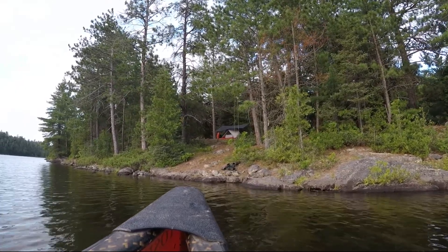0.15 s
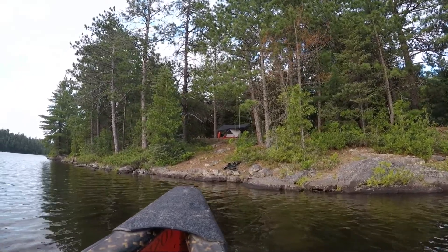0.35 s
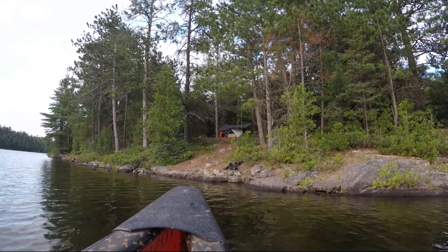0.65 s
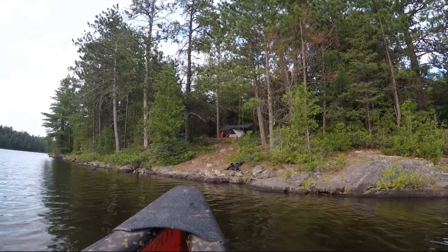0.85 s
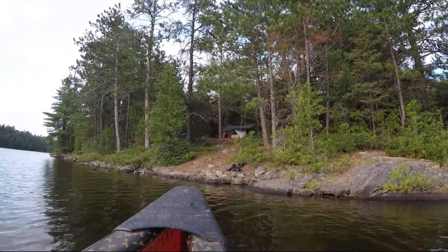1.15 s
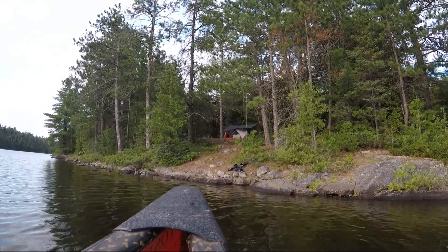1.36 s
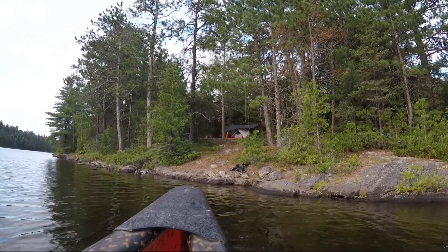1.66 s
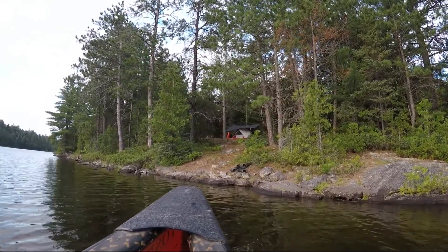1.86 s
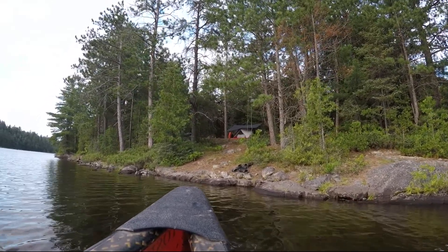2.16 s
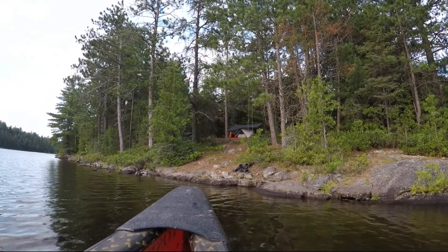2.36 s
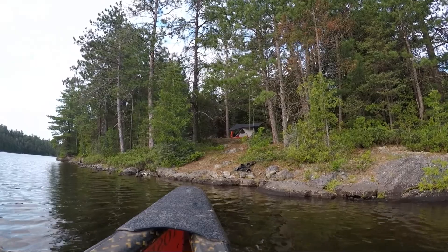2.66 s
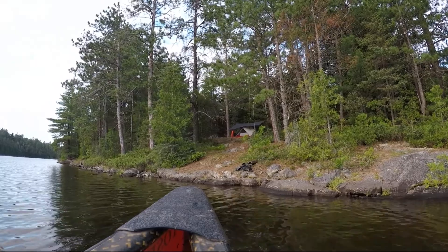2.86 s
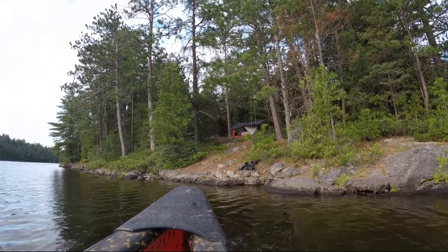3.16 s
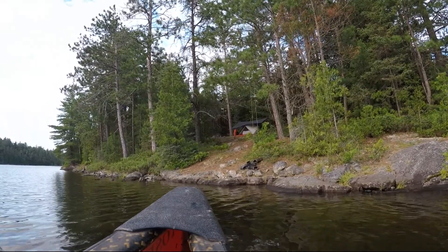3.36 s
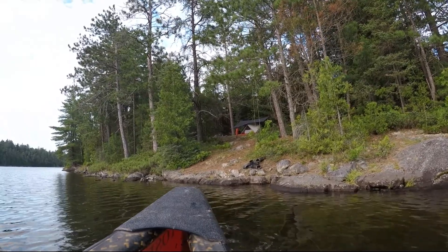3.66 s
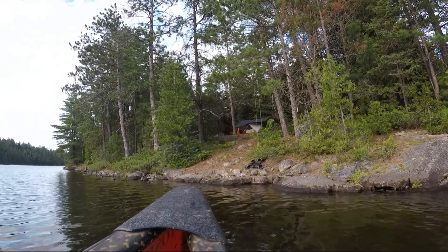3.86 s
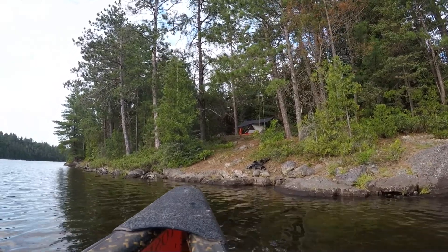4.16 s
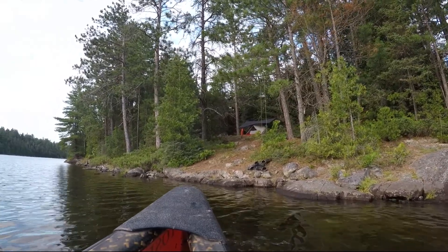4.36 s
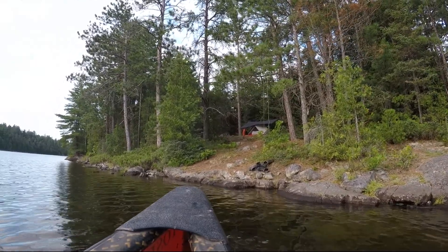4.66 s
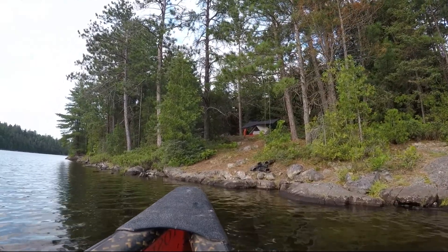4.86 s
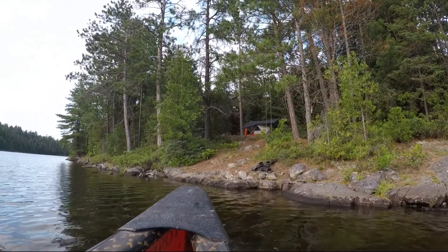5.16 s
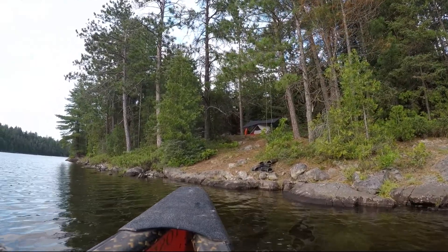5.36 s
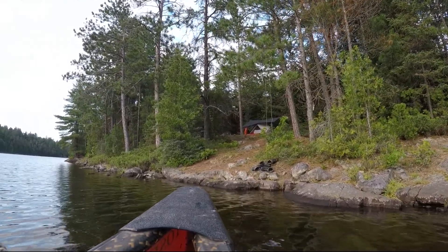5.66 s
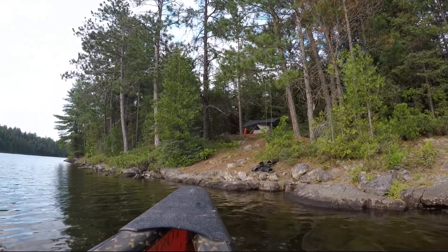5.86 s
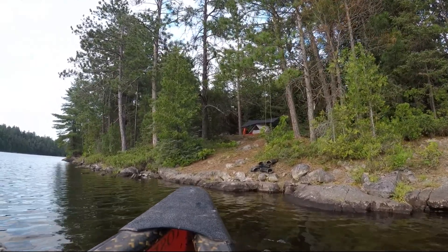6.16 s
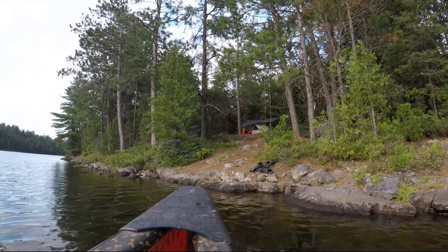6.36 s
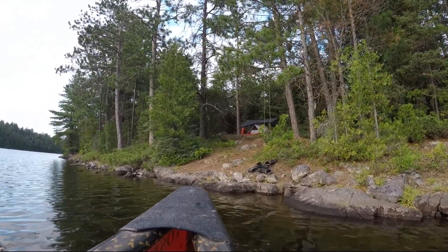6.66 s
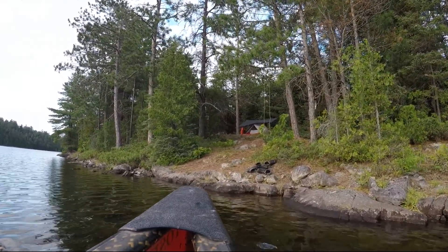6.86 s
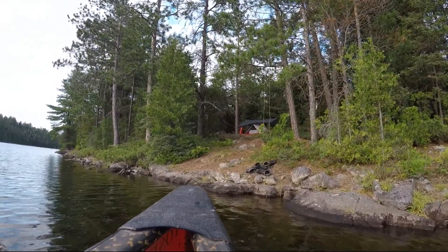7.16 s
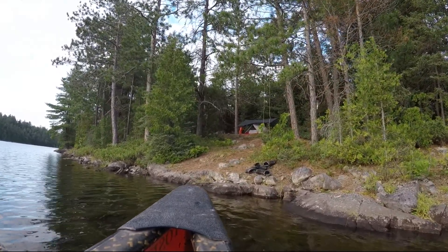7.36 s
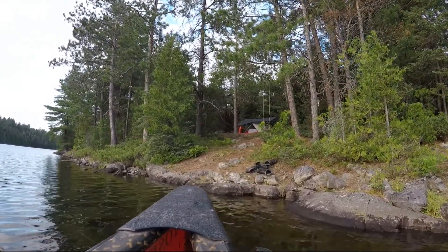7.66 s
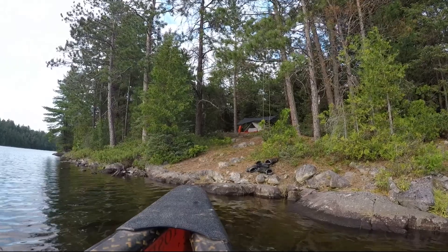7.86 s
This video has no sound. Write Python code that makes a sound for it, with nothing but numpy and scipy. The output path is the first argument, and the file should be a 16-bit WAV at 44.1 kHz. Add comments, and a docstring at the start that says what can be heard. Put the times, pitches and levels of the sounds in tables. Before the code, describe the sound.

From inside a canoe on a calm lake, faint lapping and light low wind sit under soft hiss. Small dull knocks come first, then a booming drag and thump. A heavy hollow double knock midway is the loudest event, followed by smaller thumps and rumbling scrapes. Later it quiets, with short close cloth rubs, a tiny drip, a sharp tick and two more thuds. The microphone is fixed to the boat in a closed case.

```python
"""Canoe adrift on a calm lake

Knocks of paddle and gear, and soft wave slaps, ring the hull's modes; drags boom, rumble and scrape.
Cloth rubs in noisy strokes near a closed case fixed to the boat; short rings make its ticks and one drip.
Water laps under the hull as bands of noise, with light wind in the bass and electronic hiss on top."""
import sys
import numpy as np
from scipy.fft import rfft, irfft, next_fast_len
from scipy.io import wavfile
from scipy.ndimage import map_coordinates

SR = 44100
rng = np.random.default_rng(int(sys.argv[2]) if len(sys.argv) > 2 else 0)


def to_wav(s):
    """Save 16-bit WAV."""
    ch = np.atleast_2d(s).T  # columns
    pcm = np.round(np.clip(ch, -1, 1) * 32767)  # PCM
    wavfile.write(sys.argv[1], SR, pcm.astype(np.int16))


N = 353241  # length in samples, about 8 s

# Noise colours give relative density: pitch_hz, level_db (per Hz).
# Resonance levels and widths are for one pass; each bank is applied twice.

# electronic hiss: noise colour, then its slightly wavering level: time_s, level_db
HISS_COLOUR = [(2000, -10), (2700, 0), (3300, -4.5), (4600, -1.5), (6630, -4), (8100, -1.5), (9750, -1),
               (11000, -5), (11600, -18.5), (12600, -7), (15400, -17)]
HISS_LEVEL = [(0.0, -63.5), (2.8, -64.5), (3.3, -63), (4.0, -64.5), (6.45, -64), (6.65, -62), (7.6, -63),
              (8.01, -64.5)]
TOP_HZ = 15450  # band limit of the whole mix

# wind and water levels: time_s, wind_db, deep_lapping_db, lapping_db
WATER_LEVELS = [(0.0, -57, -57, -53), (0.35, -55, -69, -51), (0.56, -49.5, -41.5, -46),
                (1.16, -45.5, -51.5, -51.5), (1.5, -48.5, -55.5, -52.5), (1.76, -39.5, -42, -44),
                (2.1, -45.5, -51, -53), (2.6, -42.5, -53, -54), (2.9, -41.5, -46.5, -48),
                (3.48, -51, -51, -51.5), (3.77, -46, -37.5, -44), (4.2, -54, -54, -41),
                (4.5, -46.5, -45, -47.5), (5.0, -40.5, -48.5, -50), (5.64, -43.5, -49.5, -53),
                (6.3, -53.5, -57.5, -53.5), (6.87, -56, -67, -47), (7.3, -48.5, -66, -47.5),
                (7.45, -35, -49, -42.5), (7.79, -42, -54.5, -49), (8.01, -36, -37, -50.5)]
# dull wash level: time_s, level_db
WASH_LEVEL = [(0.0, -55), (1.4, -56.5), (2.74, -56.5), (3.43, -52.5), (3.97, -54.5), (4.15, -45.5),
              (4.28, -55), (6.47, -56), (7.03, -51), (7.3, -54), (8.01, -55)]
# noise colours of the wind, deep lapping, lapping and dull wash
WIND_COLOUR = [(14, -29), (27, -1.5), (44, -6.5), (60, -8), (100, -24)]
SLOSH_COLOUR = [(40, -33), (60, -2), (100, 3.5), (140, -10.5)]
LAP_COLOUR = [(90, -49), (130, 1.5), (200, -2), (330, -11), (500, -33.5)]
WASH_COLOUR = [(250, -2), (400, 0), (800, -7), (1600, -11.5), (2400, -16.5), (2900, -35), (3500, -43)]

# case resonances: pitch_hz, width_hz, level_db
CASE_MODES = [(2210, 840, -4.5), (3330, 590, -1.5), (4080, 520, 1.55), (6230, 470, -5), (6310, 260, -0.5),
              (9400, 2400, -9.5)]
# case ticks, and one water drip at 6.952 s, levels before a fixed boost:
# start_s, ring_db, ring_hz, overtones_db (over the ring), spit_db, t60_s
TICKS_AND_DRIP = [(.44, -48, 1290, -15, -45, 0.023), (0.849, -51, 5130, -30, -42, 0.022),
                  (1.636, -53, 2330, -1, -46, 0.033), (1.68, -51, 2030, 0, -46, 0.022),
                  (1.696, -47, 2000, -10, -47, 0.03), (1.714, -53.5, 2170, -4, -55, 0.054),
                  (1.749, -50, 4440, -33, -46, 0.013), (2.19, -38, 1870, -25, -58, 0.01),
                  (2.337, -46.5, 1800, -25, -60, .02), (2.483, -32.5, 2860, -30, -36, 0.0069),
                  (4.263, -38, 1670, -23, -57, 0.025), (6.952, -42, 900, -25, -60, 0.023),
                  (6.97, -37, 2380, -25, -57, 0.015), (7.5413, -21, 2010, 1.5, -31, 0.0069)]

# strokes of cloth: start_s, swell_s, hold_s, release_db_per_s, bright_rub_db, dull_rub_db, silky_rub_db
CLOTH_STROKES = [(6.468, 0.0058, 0.081, 1500, -45.5, -59.5, -57), (6.647, .008, 0.041, 1200, -57, -72, -70),
                 (6.737, 0.02, .008, 350, -50, -61, -72), (6.793, 0.082, 0.024, 330, -47.5, -59, -56),
                 (6.943, 0.13, 0.016, 400, -50, -47.5, -48.5), (7.135, 0.039, 0.03, 1000, -68, -53, -55)]
# noise colour of the dull rub
DULL_COLOUR = [(700, -16), (1300, -0.5), (1650, 2), (2300, -7), (2800, -12), (3500, -8)]
SWELL_FROM_DB, TOPMOST_DB = -19.5, -9.5  # a swell's start; topmost rub over the silky rub

# drags on the hull, one curve each: time_s, boom_db, boom_hz, scrape_db
DRAG_CURVES = [
    [(0.36, -47, 153, -57), (0.41, -35, 148.6, -61), (0.448, -34, 105.3, -56), (0.494, -33, 101.3, -69),
     (0.544, -45, 97.5, -71), (0.574, -39, 99.5, -74), (0.72, -49, 93.7, -78)],
    [(1.59, -55, 110, -80), (1.634, -21.5, 142.3, -52), (1.69, -26, 144.6, -56), (1.716, -19, 104.6, -53.5),
     (1.745, -23, 99.6, -59), (1.77, -19, 95.4, -74), (1.82, -31, 92.7, -77), (1.92, -49, 91, -59)],
    [(4.07, -33, 129, -51), (4.126, -39, 131.8, -49), (4.198, -22, 117.6, -47), (4.23, -31, 127.4, -43.5),
     (4.27, -30, 129, -44.5), (4.308, -38, 127.5, -50), (4.378, -34.5, 125.6, -62), (4.47, -40, 120, -59)],
    [(4.47, -51, 119, -52), (4.502, -25, 116, -48), (4.524, -25, 110, -55.5), (4.62, -35, 132.7, -66),
     (4.718, -44, 156.5, -67), (4.75, -32.5, 158, -63)],
]
# one rumble weight a drag: level_db (over the mean of boom_db and scrape_db)
RUMBLE_WEIGHTS = [3.5, 3.5, -1.5, 4]
# noise colour of the dragging rumble
RUMBLE_COLOUR = [(110, 4.5), (180, 0.5), (300, 0.5), (500, -10), (900, -20.5)]
# resonances woken by the scrape: pitch_hz, width_hz, level_db
SCRAPE_MODES = [(600, 170, -17), (730, 210, 6.5), (1100, 150, 8), (1290, 220, 6.5), (1730, 310, 3.5),
                (2086, 180, 3), (2620, 250, -1)]
DEEP_HZ, DEEP_DB, GRIT_DB = 70.7, -7.5, -17.5  # deep boom, its level over the boom; grit over the scrape

# knocks of paddle and gear, and soft wave slaps (2.145-2.551 and 5.309-5.45 s), on the hull:
# start_s, boom_peak_db, favoured_pitch_hz, boom_delay_s,
# then contact_db (over boom_peak_db) at 500, 1500 and 5000 Hz
KNOCKS_AND_SLAPS = [(0.176, -35, 147, 0.0039, -7, -32, -18), (.376, -27, 186, 0.0032, -20, -29, -36),
                    (.802, -34, 161, 0.0058, -1.5, -10.5, -16), (1.422, -32.5, 112, 0.0026, -18, -13, -24),
                    (1.708, -13.5, 89.5, 0.0023, -20, -38, -32), (2.145, -36, 75, 0.0015, -14, -26, -33),
                    (2.446, -34, 75, 0.0019, -25, -28, -33), (2.551, -37.5, 83, 0.0018, -31, -20, -33),
                    (2.809, -29, 124, 0.0017, -14, -41, -35), (3.043, -20, 114, 0.0018, -19, -63, -37),
                    (3.605, -25.5, 100, 0.0028, -3, -20, -20),
                    (3.6141, -1.5, 208, 0.0017, -17.5, -27.5, -24.5),
                    (3.632, -7, 189, 0.0021, -19.5, -27.5, -50), (3.657, -14, 102, 0.0014, -18, -26.5, -34),
                    (3.897, -13.5, 101, 0.0021, -7.5, -27.5, -37), (3.926, -13, 91, 0.001, -35, -47, -41),
                    (4.023, -16, 245, 0.005, -10, -12, -34), (4.035, -14.5, 113, 0.0046, -30, -34, -57),
                    (4.507, -22.5, 113, 0.013, -22, -43, -48), (4.716, -30, 150, 0.004, -7, -39, -35),
                    (4.9331, -22.5, 151, 0.0084, -9.5, -17.5, -22),
                    (4.963, -28.5, 135, 0.002, -47, -38, -41), (5.029, -30.5, 101, 0.0018, -11.5, -34, -36),
                    (5.309, -32.5, 85, 0.002, -22, -32, -35), (5.414, -36.5, 80, 0.0011, -26, -27, -33),
                    (5.45, -38, 73, 0.0015, -28, -27, -33), (6.471, -31, 178, 0.0013, -2.5, -22, -32),
                    (7.4771, -17, 143, 0.012, -10, -19.5, -24.5),
                    (7.968, -21, 137, 0.012, -10.5, -21, -24.5)]
# deep hull modes: pitch_hz, level_db (relative), t60_s (unloaded)
HULL_MODES = [(50, -20, 0.47), (63, -8, 0.23), (92, -12, 0.65), (102.8, 3, 0.15), (131.1, -4, 0.32),
              (153.5, 2, 0.13), (200.7, -2, 0.25), (266.3, -0.5, 0.092), (308, -8, 0.15), (338, -22, 0.31),
              (399.4, -15, 0.37)]
# upper hull modes, too dense to count, ringing as noise: lowest_hz, highest_hz, t60_s (unloaded)
DENSE_BANDS = [(213, 457, 0.29), (500, 890, 0.15), (976, 1590, 0.14), (1800, 2560, 0.088),
               (2960, 5560, 0.059), (7200, 15000, 0.037)]
# the gunwale's short clack: pitch_hz, level_db (relative), t60_s
RIM_MODES = [(566, -10.5, 0.024), (750, -1, 0.0099), (794, 4, 0.023), (1119, 3, 0.022), (1200, 2, 0.028),
             (1720, -4, 0.014), (2184, -0.5, 0.028)]
DAMPING = 1.35  # load in the boat shortens the hull's rings by this factor


def amp(db):
    """Decibels to gain."""
    return np.exp(np.asarray(db) * (np.log(10) / 20))


def unit(x):
    """Scales a signal to rms 1."""
    return x / np.sqrt(np.mean(x ** 2) + 1e-20)


def curves(rows):
    """A gate open while the rows last, then one value per sample for each column after the time."""
    times, *columns = np.transpose(rows)
    t = np.arange(N) / SR
    to_edge = np.minimum(t - times[0], times[-1] - t)
    gate = np.clip(to_edge / 0.013 + 0.5, 0, 1)
    return gate, *[np.interp(t, times, column) for column in columns]


def wobble(rate):
    """A smooth random curve through rate knots a second."""
    coarse = np.arange(0, N + 16, 16)
    knots = rng.standard_normal(int(N * rate / SR) + 4)
    smooth = map_coordinates(knots, [coarse * rate / SR])
    return np.interp(np.arange(N), coarse, smooth)


def filtered(x, response):
    """Multiplies the spectrum of x by a response of frequency."""
    size = next_fast_len(N + SR // 2)
    spectrum = rfft(x, size) * response(np.fft.rfftfreq(size, 1 / SR))
    return irfft(spectrum, size)[..., :N]


def noise(colour):
    """Noise of rms 1 coloured by pitch and level points, practically silent outside them."""
    points_hz, points_db = np.transpose(colour)

    def shape(hz):
        """Gain interpolated along log frequency."""
        return amp(np.interp(np.log(hz + 1), np.log(points_hz + 1), points_db, left=-120, right=-120))

    return unit(filtered(rng.standard_normal(N), shape))


def resonate_twice(x, modes):
    """Two passes through a bank of resonances of alternating sign, which keeps the valleys dark."""
    def one_pass(f):
        """Sum of the band-pass resonances."""
        total = 0
        for k, (pitch, width, db) in enumerate(modes):
            loss = 1j * f * width
            total = total + (-1) ** k * amp(db) * loss / (pitch * pitch - f * f + loss)
        return total

    return filtered(x, lambda f: one_pass(f) ** 2)


def wind():
    """Light wind presses on the microphone as low noise that wavers slowly."""
    wind_db = curves(WATER_LEVELS)[1]
    return amp(wind_db) * unit(amp(1.4 * wobble(2.7)) * noise(WIND_COLOUR))


def lapping():
    """Ripples lap the hull from below as two low noise bands; a dull wash lies above."""
    _, _, slosh_db, lap_db = curves(WATER_LEVELS)
    ripples = wobble(15)  # shared by all three layers
    slosh = unit(amp(1.5 * ripples) * noise(SLOSH_COLOUR))
    lap = unit(amp(1.64 * ripples) * noise(LAP_COLOUR))
    wash = unit(amp(0.6 * ripples + 0.6 * wobble(60)) * noise(WASH_COLOUR))
    wash_db = curves(WASH_LEVEL)[1]
    return amp(slosh_db) * slosh + amp(lap_db) * lap + amp(wash_db) * wash


def ticks_and_drip():
    """Each tick, and the drip, is a short ring with two overtones and a spit of noise through the case."""
    ring, spit = np.zeros(N), np.zeros(N)
    t = np.arange(SR // 20) / SR
    for start, ring_db, hz, over_db, spit_db, t60 in TICKS_AND_DRIP:
        fade = amp(-60 * t / t60) * (1 - np.exp(-t / 0.0014))
        phase = 2 * np.pi * hz * t
        overtones = np.sin(2.087 * phase) + 0.24 * np.sin(3.06 * phase)
        tone = np.sin(phase) + amp(over_db) * overtones
        at = round(start * SR)
        ring[at:][:len(t)] += 1.3 * amp(ring_db) * fade * tone
        spit[at:][:len(t)] += 3.5 * amp(spit_db) * fade * rng.standard_normal(len(t))
    return ring + resonate_twice(spit, CASE_MODES)


def cloth_rub():
    """Cloth friction is flickering noise, its bright part coloured by the case, in swelling strokes."""
    flicker = amp(1.4 * wobble(300))
    bright = unit(resonate_twice(rng.standard_normal(N), CASE_MODES))
    dull = noise(DULL_COLOUR)
    silky = noise([(2600, -20), (3600, -1.5), (5000, -5), (5800, 1.0), (6800, -8), (8000, -16), (11000, -19)])
    topmost = noise([(11500, -3), (12400, -0.1), (15400, -8)])
    out, t = np.zeros(N), np.arange(N) / SR
    for start, swell, hold, release, bright_db, dull_db, silky_db in CLOTH_STROKES:
        rise_db = SWELL_FROM_DB * np.clip(1 - (t - start) / swell, 0, 1)
        fall_db = release * np.maximum(t - start - swell - hold, 0)
        stroke = (t >= start) * amp(rise_db - fall_db)
        rub = amp(bright_db) * bright + amp(dull_db) * dull
        rub += amp(silky_db) * (silky + amp(TOPMOST_DB) * topmost)
        out += stroke * rub
    return flicker * out


def drags():
    """Dragging shakes the hull into two unsteady booms and a rumble, with flickering scrape and grit."""
    rumble = noise(RUMBLE_COLOUR)
    # sparse catches, about 300 a second, stand out of the steady friction
    catches = rng.standard_normal(N) * (1 + 9 * (rng.random(N) < 300 / SR))
    scrape = unit(resonate_twice(catches, SCRAPE_MODES))
    grit = noise([(2800, -4), (4000, -1.5), (6000, -6.5), (7500, -22)])
    flicker = amp(0.88 * wobble(140))
    boom_size, boom_phase = amp(2.5 * wobble(50)), 1.1 * wobble(50)  # gain; radians

    def boom(hz):
        """A sine that follows a pitch curve, with unsteady size and phase."""
        return boom_size * np.sin(2 * np.pi * np.cumsum(hz) / SR + boom_phase)

    deep = boom(np.full(N, DEEP_HZ))
    out = np.zeros(N)
    for rows, weight_db in zip(DRAG_CURVES, RUMBLE_WEIGHTS):
        gate, boom_db, boom_hz, scrape_db = curves(rows)
        booms = amp(boom_db) * (boom(boom_hz) + amp(DEEP_DB) * deep)
        rough = amp((boom_db + scrape_db) / 2 + weight_db) * rumble
        rough += amp(scrape_db) * (scrape + amp(GRIT_DB) * grit)
        out += gate * (booms + flicker * rough)
    return out


def contact_db(hz, peak_db, upper_db):
    """Each knock or slap has its own treble levels over its boom, interpolated along log frequency."""
    points_db = [*upper_db, upper_db[-1] - 12.0]
    return peak_db + np.interp(np.log(hz), np.log([500, 1500, 5000, 10000]), points_db)


def hull_booms():
    """Each knock or slap rings the deep hull modes; these slow bending waves arrive after the treble."""
    out, t = np.zeros(N + SR), np.arange(SR // 3) / SR
    hz, mode_db, t60 = np.transpose(HULL_MODES)[:, :, None]
    waves = (1 - np.exp(-t * hz / 0.43)) * np.sin(2 * np.pi * hz * t)
    for start, peak_db, spot_hz, delay, *_ in KNOCKS_AND_SLAPS:
        # modes near the spot's pitch are favoured
        level_db = mode_db - 12 * np.abs(np.log2(hz / spot_hz)) + rng.normal(0, 2.0, hz.shape)
        ring = np.sum(amp(level_db - 60 * t * DAMPING / t60) * waves, axis=0)
        at = round((start + delay) * SR)
        out[at:at + len(t)] += amp(peak_db) * ring / np.abs(ring).max()
    return out[:N]


def dense_rings():
    """Upper hull modes lie so close that each knock or slap rings them as decaying bands of noise."""
    out, t = np.zeros(N + SR), np.arange(SR // 3) / SR
    low, high, t60 = np.transpose(DENSE_BANDS)[:, :, None]
    bands = [noise([(a * 0.8, -16), (a, 0), (b, -3), (b * 1.2, -18)]) for a, b, _ in DENSE_BANDS]
    bands = np.pad(bands, ((0, 0), (0, SR)))
    rise = 1 - np.exp(-t * np.sqrt(low) / 0.054)
    for start, peak_db, _, _, *upper_db in KNOCKS_AND_SLAPS:
        at = round(start * SR)
        start_db = contact_db(np.sqrt(low * high), peak_db, upper_db) - 5.5
        gain = amp(start_db - 60 * t * DAMPING / t60) * rise
        out[at:at + len(t)] += np.sum(gain * bands[:, at:at + len(t)], axis=0)
    return out[:N]


def rim_clacks():
    """Each knock or slap clacks on the gunwale's short modes, as loud as its contact levels set."""
    out, t = np.zeros(N + SR), np.arange(SR // 10) / SR
    hz, mode_db, t60 = np.transpose(RIM_MODES)[:, :, None]
    waves = amp(mode_db - 60 * t / t60) * (1 - np.exp(-t / 0.00084)) * np.sin(2 * np.pi * hz * t)
    for start, peak_db, _, _, *upper_db in KNOCKS_AND_SLAPS:
        at = round(start * SR)
        level_db = contact_db(hz, peak_db, upper_db) - 2.5 + rng.normal(0, 1, hz.shape)
        out[at:at + len(t)] += np.sum(amp(level_db) * waves, axis=0)
    return out[:N]


def knocks_and_slaps():
    """A knock or slap sums the late deep boom, the dense upper ring and the rim's clack."""
    return hull_booms() + dense_rings() + rim_clacks()


def scene():
    """All sources at the one microphone."""
    return (wind() + lapping() + ticks_and_drip() + cloth_rub() + drags() + knocks_and_slaps())[None]


def record(dry):
    """The electronics add their hiss; nothing is kept above the band limit."""
    hiss = amp(curves(HISS_LEVEL)[1]) * noise(HISS_COLOUR)
    return filtered(dry + hiss, lambda hz: hz < TOP_HZ)


dry = scene()
out = record(dry)
to_wav(out)
```